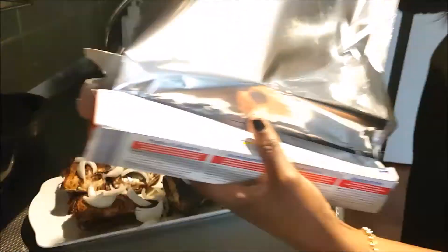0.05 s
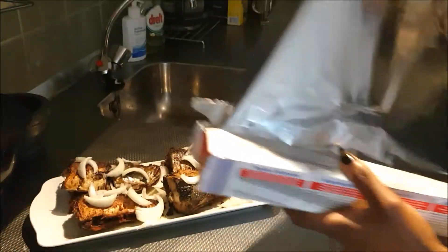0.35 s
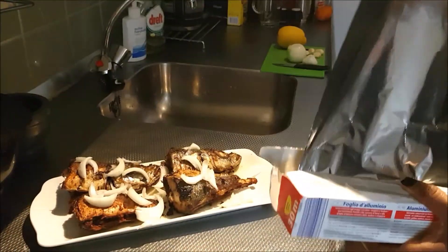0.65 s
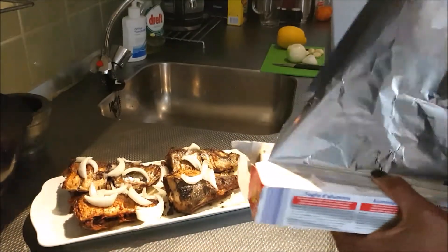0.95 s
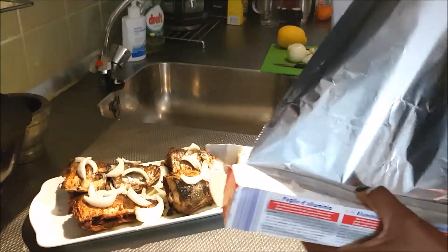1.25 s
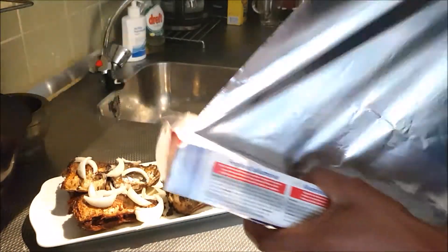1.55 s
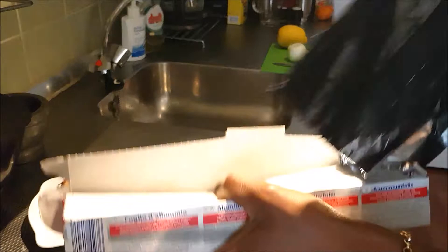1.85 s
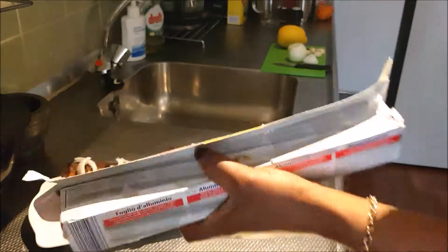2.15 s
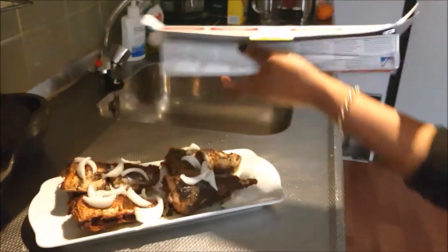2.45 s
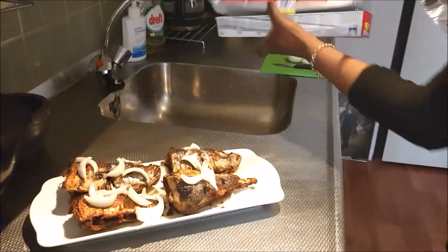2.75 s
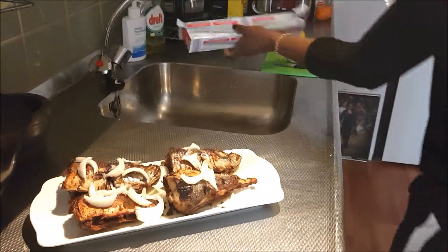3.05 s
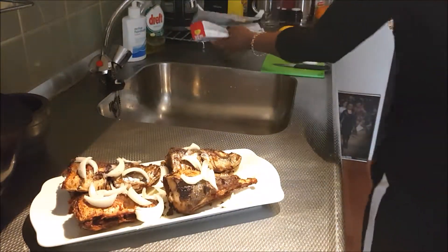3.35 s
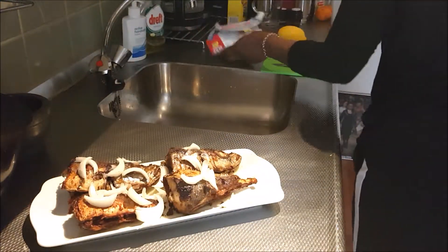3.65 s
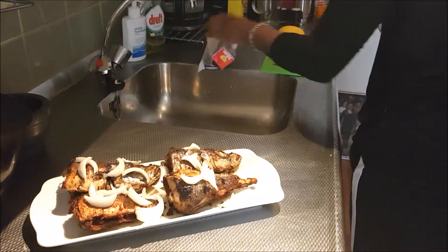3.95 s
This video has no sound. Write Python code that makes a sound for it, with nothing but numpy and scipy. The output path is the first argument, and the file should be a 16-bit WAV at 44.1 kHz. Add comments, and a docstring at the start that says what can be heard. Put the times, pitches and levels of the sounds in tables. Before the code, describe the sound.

Aluminium foil crinkles and pops in uneven pulls for the first 1.5 seconds. It tears off loudly in two rasping strokes, at about 1.7 and 2.0 seconds, while the hollow cardboard box flexes and knocks. From 2.4 seconds the sheet rustles more faintly, with light taps on the box. The box bumps onto a worktop at about 3.4 and 3.8 seconds. A low kitchen room rumble lies underneath.

```python
"""Tearing off aluminium foil

In a small kitchen, foil is pulled from its cardboard box, crackling with thousands of tiny buckles
a second; creases snap and panels pop. Two strokes along the serrated edge rasp through the hollow
box, which flexes in the hand. The box is tapped by the fingers and bumped twice onto the booming
worktop while the sheet rustles on, over a low room rumble."""
import sys
import numpy as np
from scipy import signal
from scipy.fft import rfft, irfft
from scipy.io import wavfile

SR = 44100
rng = np.random.default_rng(int(sys.argv[2]) if len(sys.argv) > 2 else 0)


def wrap_up_sound(samples):
    """Save the sound to the file named by the first command line argument, as 16-bit audio."""
    columns = np.atleast_2d(samples).T
    # keep every value between -1 and 1, then stretch to whole-number steps
    tamed = np.clip(columns, -1, 1)
    steps = np.round(tamed * 32767).astype(np.int16)
    wavfile.write(sys.argv[1], SR, steps)


N = 176400


def amp(db):
    """Decibels to gain."""
    return 10 ** (np.asarray(db) / 20)


def unit(x):
    """Scale to rms 1."""
    return x / np.sqrt(np.mean(x ** 2) + 1e-20)


def along(points, hz):
    """Interpolate (f/Hz, value) points on a log frequency axis."""
    f, v = np.transpose(points)
    return np.interp(np.log(hz + 1), np.log(f + 1), v)


def curve(rows):
    """Interpolate (t/s, level/dB) points per sample; silent outside."""
    return np.interp(np.arange(N) / SR, *np.transpose(rows), left=-120, right=-120)


def grid():
    """Filter grid in Hz."""
    return np.fft.rfftfreq(2 * N, 1 / SR)


def colour(x, gain):
    """Minimum-phase filter from a gain on the grid; keeps the power of white noise."""
    cepstrum = irfft(np.log(np.maximum(unit(gain), 1e-6)))
    cepstrum[1:N] *= 2
    cepstrum[N + 1:] = 0
    return irfft(rfft(x, 2 * N) * np.exp(rfft(cepstrum)))[..., :N]


def pan(db):
    """Stereo gains for a left-minus-right level."""
    return amp(np.array([[db], [-db]]) / 2)


def add(track, s, sound):
    """Mix a sound in at s seconds."""
    i = min(max(round(s * SR), 0), N - 1)
    track[..., i:i + sound.shape[-1]] += sound[..., :N - i]


def burst(t60):
    """Decaying white noise."""
    t = np.arange(SR // 4) / SR
    return rng.standard_normal(len(t)) * amp(-60 * t / t60)


# diffuse field: f/Hz, left-right coherence
COHERENCE = [(100, 0.9), (500, 0.79), (1000, 0.029)]


def diffuse():
    """Stereo noise, alike in the bass and unrelated in the treble."""
    angle = np.arccos(np.clip(along(COHERENCE, grid()[::2]), -1, 1)) / 2
    mid, side = irfft(rfft(rng.standard_normal((2, N))) * [np.cos(angle), np.sin(angle)], N)
    return np.array([mid + side, mid - side])


# room decay: f/Hz, t60/s
KITCHEN_DECAY = [(150, 0.32), (1000, 0.22), (4000, 0.26), (15000, 0.13)]


def kitchen(x, wet_db, places):
    """Tiles and cupboards reflect; each block of sound leaves from a random place with its own echo."""
    wet, block = np.zeros((2, N)), 64
    place = np.repeat(rng.integers(places, size=N // block + 1), block)[:N]
    for k in range(places):
        hz, t, noise = signal.stft(diffuse()[:, :SR // 2], SR, nperseg=256)
        decay = amp(-60 * t / along(KITCHEN_DECAY, hz)[:, None])
        tail = signal.istft(noise * decay, SR, nperseg=256)[1]
        add(wet, 0, signal.fftconvolve(x * (place == k), tail / np.linalg.norm(tail[0]), axes=1))
    return (x + amp(wet_db) * wet) / np.hypot(1, amp(wet_db))


# background spectrum: f/Hz, level/dB
RUMBLE_SPECTRUM = [(25, -29), (60, 3), (85, 6.5), (130, -2), (185, 6.5), (300, -2.5), (3000, -17.5),
                   (15000, -57)]


def room_rumble(level_db=-47.5):
    """Low, steady, diffuse noise."""
    return amp(level_db) * unit(colour(diffuse(), amp(along(RUMBLE_SPECTRUM, grid()))))


def buckles(per_s, scatter_db, life_s, width_db, lag_s):
    """Each buckle is a tiny ping of random size, pitch and place; total rms 1."""
    chance = np.clip(per_s / SR, 1e-4, .3)
    at = np.flatnonzero(rng.random(N) < chance)
    size, pitch, side, phase = rng.random((len(at), 4)).T[..., None]
    gain = amp(scatter_db * np.minimum(-np.log(size), 5))
    gain /= np.sqrt(chance[at, None])  # power independent of rate
    k = np.arange(64)
    pings = gain * np.cos(2 * np.pi * (pitch * k / 2 + phase)) * np.exp(-k / (life_s * SR))
    place = 2 * side - 1
    ears = []
    for offset in (place, -place):
        index = np.abs(at[:, None] + k + np.round(offset * lag_s * SR).astype(int))
        ears.append(np.bincount(index.ravel(), (pings * amp(offset * width_db)).ravel(), N)[:N])
    return unit(np.array(ears))


# crinkle envelope as the foil is pulled, torn off, held loose: t/s, level/dB
FOIL_PULLED = [(0, -19), (.05, -20), (.09, -25), (.25, -22), (.33, -23), (.405, -33), (.46, -22),
               (.53, -30), (.56, -39), (.598, -39), (.606, -31), (.705, -29), (.75, -35), (.81, -28),
               (.92, -33), (.952, -27.5), (1.06, -41), (1.11, -37), (1.14, -30), (1.19, -28.5), (1.34, -39),
               (1.392, -43)]
FOIL_TORN = [(1.406, -28), (1.45, -34), (1.59, -28), (1.62, -24), (1.68, -22), (1.765, -17.5),
             (1.82, -19.5), (1.86, -25), (1.96, -30), (1.99, -24.5), (2.08, -22), (2.16, -24), (2.2, -30),
             (2.24, -30), (2.28, -38.5), (2.33, -42.5)]
FOIL_LOOSE = [(2.41, -41), (2.43, -27), (2.47, -31), (2.56, -44), (2.585, -34.5), (2.69, -55.5),
              (2.825, -59.5), (2.845, -47), (2.94, -45.5), (3.0, -37), (3.19, -61.5), (3.235, -63),
              (3.255, -50.5), (3.35, -58), (3.42, -49.5), (3.52, -55.5), (4.0, -52.5)]
# creases snapping through: t/s, level/dB
CREASE_SNAPS = [(.604, -19.5), (1.219, -28), (1.405, -18), (1.73, -17), (3.368, -38.5), (3.835, -26.5)]
# foil spectrum: f/Hz, level/dB
FOIL_SPECTRUM = [(100, -12.5), (200, -20), (420, -10.5), (900, -6.5), (1400, -3), (2500, -0.5),
                 (4500, -1.5), (6800, -1), (8200, 2), (9700, -2), (12000, 1.5), (15500, -0.5)]
FOIL_PAN_DB = -2.5


def foil_crinkle(gain_db=5, busy_db=-28, busy_buckles_per_s=4000):
    """The faster the foil bends, the denser, louder and brighter its buckles; a few creases snap."""
    level_db = curve(FOIL_PULLED + FOIL_TORN + FOIL_LOOSE)
    per_s = busy_buckles_per_s * amp(level_db - busy_db) ** .45
    crackle = buckles(per_s, scatter_db=2.5, life_s=89e-6, width_db=3, lag_s=150e-6)
    foil = amp(level_db + gain_db) * crackle
    for s, db in CREASE_SNAPS:
        add(foil, s, amp(db) * np.array([burst(t60=.067) for _ in range(2)]))
    lows = signal.lfilter(*signal.butter(1, 2660, fs=SR), foil)
    shelf_db = .31 * (busy_db - level_db)  # slow bending is duller
    foil += lows * (amp(shelf_db) - 1)
    in_room = kitchen(foil, wet_db=4.5, places=8)
    return pan(FOIL_PAN_DB) * colour(in_room, amp(along(FOIL_SPECTRUM, grid())))


# panels popping through: t/s, level/dB, f/Hz
PANEL_POPS = [(0.608, -36.5, 1230), (.945, -32.5, 895), (1.218, -28, 2293)]


def foil_pops(weak_modes=12, log_spread=.25, t60_s=.11):
    """A foil panel flips and rings tinnily: one main mode among weaker scattered ones."""
    out, t = np.zeros((2, N)), np.arange(SR // 4) / SR
    for s, db, hz in PANEL_POPS:
        modes_hz = hz * np.exp(np.append(0, log_spread * rng.standard_normal(weak_modes)))
        sizes = np.append(2, rng.random(weak_modes))
        phases = rng.random((2, weak_modes + 1, 1))
        ring = unit(sizes @ np.sin(2 * np.pi * (modes_hz[:, None] * t + phases)))
        add(out, s, amp(db - 60 * t / t60_s) * ring)
    return pan(FOIL_PAN_DB) * kitchen(out, wet_db=-11.5, places=1)


# air notes of the flexing box: t/s, level/dB, f/Hz
FLEX_NOTES = [(1.61, -27, 250), (1.712, -28, 435), (1.785, -16.5, 394.4), (2.022, -11, 442.4)]
BOX_PAN_DB = -2.5


def box_flexes(rise_s=.014, t60_s=.15):
    """The walls give under the grip and pump the air inside; the lid gap sets its hollow note."""
    out, t = np.zeros((2, N)), np.arange(SR // 4) / SR
    swell = (1 - np.exp(-t / rise_s)) ** 2
    for s, db, hz in FLEX_NOTES:
        add(out, s, amp(db - 60 * t / t60_s) * swell * np.sin(2 * np.pi * hz * t))
    return pan(BOX_PAN_DB) * kitchen(out, wet_db=-6.5, places=1)


# cardboard wall modes: f/Hz, width/Hz, level/dB
WALL_MODES = [(560, 57, -12), (1030, 280, -1), (1294, 35, 10), (1423, 15, 15), (2500, 350, -3.5)]


def cardboard(spectrum, walls_db, cavity_db, pitch=1, cavity_hz=436, cavity_width_hz=44):
    """Gain of the box: wall modes and the air inside, over a broad spectrum."""
    f = grid()
    modes = [(hz * pitch, width, db + walls_db) for hz, width, db in WALL_MODES]
    modes.append((cavity_hz, cavity_width_hz, cavity_db))
    power = sum(amp(db) ** 2 / (1 + (2 * (f - hz) / width) ** 2) for hz, width, db in modes)
    return amp(along(spectrum, f)) * np.sqrt(1 + power)


def knock(t60, yield_s=.0015):
    """A burst with the soft start of yielding cardboard."""
    hit = burst(t60)
    return hit * (1 - np.exp(-np.arange(len(hit)) / (yield_s * SR)))


# knocks on the box: t/s, level/dB
BOX_TAPS = [(1.613, -22), (1.72, -18.5), (1.757, -20), (1.882, -23), (2.163, -29.5), (2.285, -33.5),
            (2.307, -29.5), (2.644, -29.5), (2.867, -31.5), (3.995, -29)]
# tap spectrum: f/Hz, level/dB
TAP_SPECTRUM = [(100, -1), (240, 3), (450, -6.5), (800, 2), (1500, -0.5), (2500, -5), (12000, -30)]


def box_taps(gain_db=2.5):
    """Soft fingers, the loose lid and the jerking foil knock on the cardboard."""
    knocks = np.zeros((2, N))
    for s, db in BOX_TAPS:
        add(knocks, s, amp(db + gain_db) * knock(t60=.037))
    box = cardboard(TAP_SPECTRUM, walls_db=-1, cavity_db=13.5)
    return pan(BOX_PAN_DB) * colour(kitchen(knocks, wet_db=-4, places=2), box)


def tooth_bites(teeth_per_s=130, scatter_db=1, t60_s=.025, steady_scrape=.18):
    """The edge catches and lets go unevenly; each slip is a spurt of scraping."""
    gaps, sizes = rng.standard_normal((2, 2000))
    at = (np.cumsum(np.exp(.35 * gaps)) / teeth_per_s * SR).astype(int)
    strength = amp(scatter_db * np.clip(sizes, -2, 2))
    slips = np.bincount(at[at < N], strength[at < N], N)
    spurts = signal.lfilter([1], [1, -amp(-60 / (t60_s * SR))], slips)
    return unit((steady_scrape + spurts) * diffuse())


# force on the serrated edge, one list per stroke: t/s, level/dB
STROKE_FORCES = [
    [(1.66, -28), (1.672, -24.5), (1.706, -26), (1.72, -19.5), (1.765, -20.5), (1.785, -23), (1.84, -28.5),
     (1.89, -37)],
    [(1.977, -27), (1.987, -26.5), (2.025, -22), (2.1, -22.5), (2.125, -38), (2.147, -23.5), (2.172, -31)],
]
# box as gripped in each stroke: wall pitch ratio, cavity level/dB
STROKE_GRIPS = [(1.035, 8), (.96, 10)]
# rasp spectrum: f/Hz, level/dB
RASP_SPECTRUM = [(80, -22), (170, -6), (320, -8.5), (700, -3), (1350, -1.5), (2400, -1.5), (4500, -9),
                 (12000, -30)]


def tear():
    """Tooth after tooth bites through the foil and shakes the hollow box."""
    out = np.zeros((2, N))
    for force, (pitch, cavity_db) in zip(STROKE_FORCES, STROKE_GRIPS):
        rasp = kitchen(amp(curve(force)) * tooth_bites(), wet_db=-8, places=4)
        out += colour(rasp, cardboard(RASP_SPECTRUM, walls_db=-1, cavity_db=cavity_db, pitch=pitch))
    return pan(BOX_PAN_DB) * out


# box hitting the worktop: t/s, slap level/dB, boom level/dB, slap cutoff/Hz, slap t60/s
CONTACTS = [(3.365, -12.5, -44, 1250, 0.035), (3.372, -14.5, -15, 1200, 0.021),
            (3.478, -25, -22.5, 290, 0.043), (3.5, -33, -21.5, 330, 0.098), (3.829, -14.5, -29, 2920, 0.1),
            (3.849, -18.5, -23, 1400, 0.079), (3.872, -24.5, -20, 1000, 0.11),
            (3.899, -32.5, -21.5, 696, 0.11)]
# slap spectrum: f/Hz, level/dB
SLAP_SPECTRUM = [(60, -2.5), (170, 3), (265, 1.5), (340, -6), (450, -4), (850, -1.5), (1400, -3.5),
                 (2400, -6.5), (8000, -11), (15000, -4)]
# worktop modes: f/Hz, level/dB, t60/s
WORKTOP_MODES = [(72.2, -3.5, 0.3), (106.5, 5, 0.21), (150, -3.5, 0.18), (254, -14.5, 0.17)]


def box_bumps(slap_gain_db=-1, boom_rise_s=.0076):
    """Two bumps of four contacts; each contact slaps the cardboard and sets the worktop booming."""
    slaps, booms, t = np.zeros((2, N)), np.zeros(N), np.arange(SR // 2) / SR
    ring = sum(amp(db - 60 * t / t60) * np.sin(2 * np.pi * hz * t) for hz, db, t60 in WORKTOP_MODES)
    boom = ring * (1 - np.exp(-t / boom_rise_s)) ** 2
    for s, slap_db, boom_db, cutoff_hz, t60 in CONTACTS:
        slap = signal.lfilter(*signal.butter(2, cutoff_hz, fs=SR), knock(t60))
        makeup = np.sqrt(SR / 2 / cutoff_hz)
        add(slaps, s, amp(slap_db) * makeup * slap)
        add(booms, s, amp(boom_db) * boom)
    box = cardboard(SLAP_SPECTRUM, walls_db=-3, cavity_db=5)
    slaps = colour(kitchen(slaps, wet_db=1, places=1), box)
    return pan(db=1) * (amp(slap_gain_db) * slaps + booms)


def scene():
    """Foil, box and room together."""
    foil = foil_crinkle() + foil_pops() + tear()
    box = box_flexes() + box_taps() + box_bumps()
    return foil + box + room_rumble()


def record(dry, ceiling=.93, low_cut_hz=45, top_hz=16000):
    """Soft peak limiter, bass cut and band limit."""
    limited = dry / (1 + (dry / ceiling) ** 10) ** (1 / 10)
    thinned = signal.sosfilt(signal.butter(2, low_cut_hz, "highpass", fs=SR, output="sos"), limited)
    return irfft(rfft(thinned, 2 * N) * (grid() < top_hz))[:, :N]


dry = scene()
out = record(dry)
wrap_up_sound(out)
```